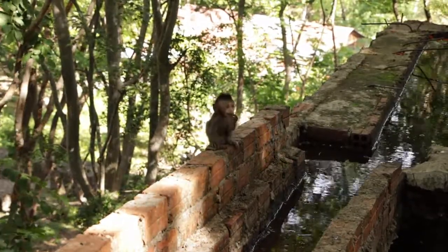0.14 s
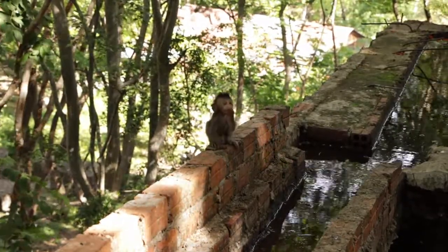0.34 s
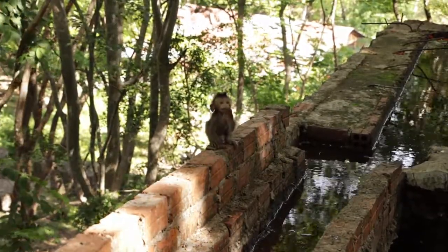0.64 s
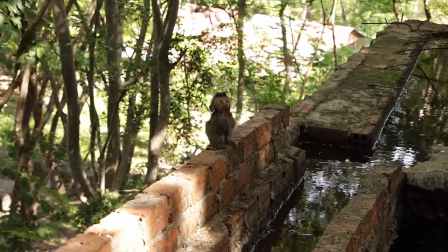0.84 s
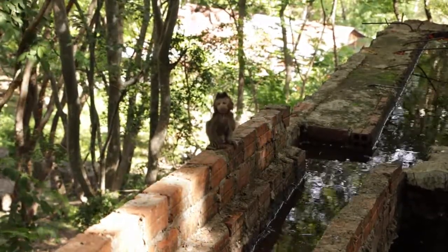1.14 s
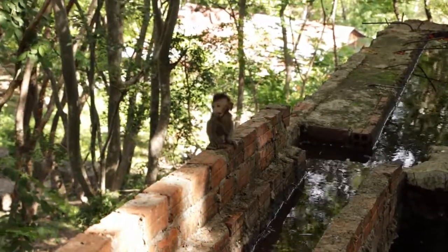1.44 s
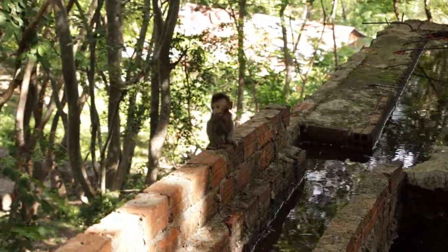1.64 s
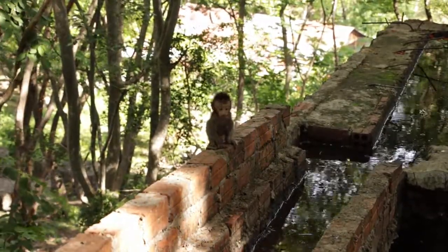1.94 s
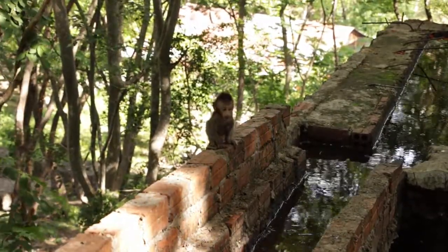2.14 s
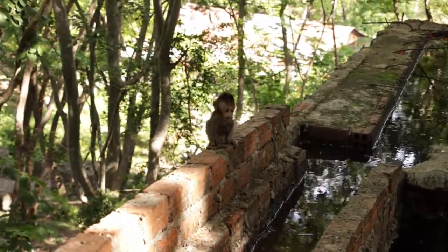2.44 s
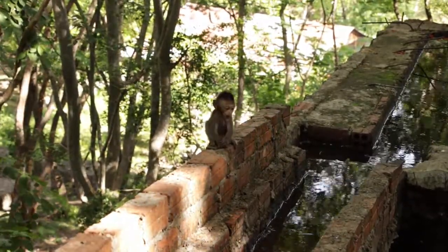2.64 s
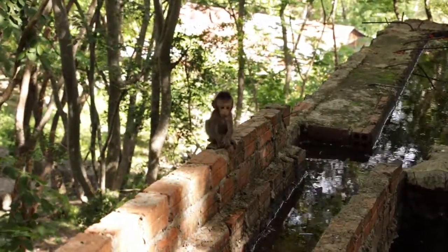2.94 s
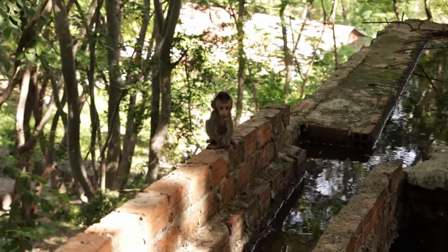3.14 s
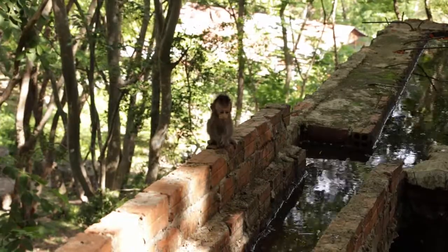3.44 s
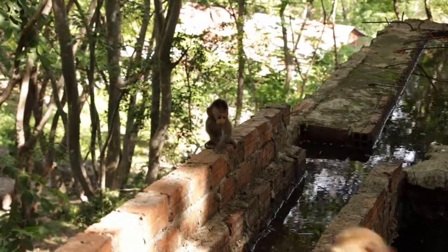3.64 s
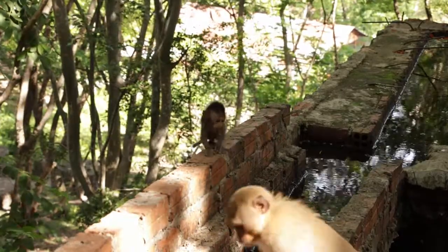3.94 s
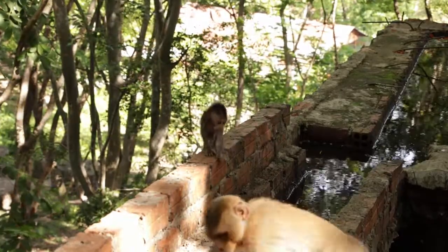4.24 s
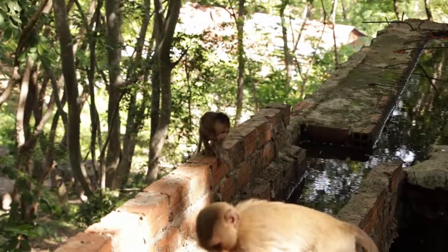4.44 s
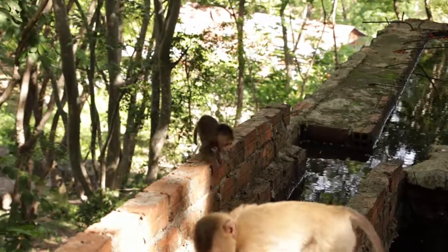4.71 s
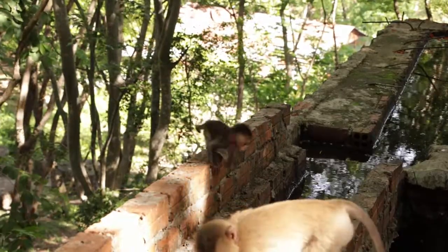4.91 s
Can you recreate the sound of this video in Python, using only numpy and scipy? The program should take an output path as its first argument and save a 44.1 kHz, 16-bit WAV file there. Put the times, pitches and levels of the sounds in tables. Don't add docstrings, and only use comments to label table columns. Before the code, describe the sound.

Birds whistle and chirp over a soft woodland wash while monkeys tap and snap dry leaves, ending in a hollow wooden knock and sharp cracks.

```python
import sys
import numpy as np
from scipy import signal
from scipy.io import wavfile
from scipy.ndimage import uniform_filter1d

SR = 44100
rng = np.random.default_rng(int(sys.argv[2]) if len(sys.argv) > 2 else 0)


def invert_db(level):
    return 10 ** (np.asarray(level, dtype=float) / 20)


def master_out(mix):
    frames = np.transpose(np.atleast_2d(mix))
    ceiling = np.clip(frames, -1, 1)
    pcm = np.round(ceiling * 32767).astype(np.int16)
    wavfile.write(sys.argv[1], SR, pcm)


N = 223719
LAG = 8
BIRD_LEAN_DB = 0.77


def evened(x):
    return x / np.sqrt(np.mean(x ** 2) + 1e-20)


def read(points, hz):
    f, value = np.transpose(points)
    return np.interp(np.log(hz + 1), np.log(f + 1), value)


def add(mix, s, sound):
    part = mix[..., round(s * SR):][..., :sound.shape[-1]]
    part += sound[..., :part.shape[-1]]


def sides(db):
    return invert_db(np.array([[db / 2], [-db / 2]]))


def band(x, lo_hz, hi_hz):
    sos = signal.butter(2, [lo_hz, hi_hz], "band", fs=SR, output="sos")
    return signal.sosfilt(sos, x) / np.sqrt(2 * (hi_hz - lo_hz) / SR)


def drift(size, hz):
    r = np.exp(-np.pi * hz / SR)
    settle = 3000
    white = rng.standard_normal((size + settle, 2)) @ [1, 1j]
    z = signal.lfilter([1], [1, -2 * r, r * r], white)[settle:]
    return z / np.sqrt(np.mean(abs(z) ** 2))


def paired(size, same):
    a, b = rng.standard_normal((2, size + LAG))
    left = same * a[:size] + np.sqrt(1 - same ** 2) * b[:size]
    return np.array([left, a[LAG:]])


def lagged(x):
    return np.array([np.roll(x, LAG), x])


def woods(x, t60, gap_s):
    t = np.arange(SR // 2) / SR
    tail = rng.standard_normal((2, len(t))) * invert_db(-60 * t / t60) * (t > gap_s)
    return signal.fftconvolve(x, tail / np.linalg.norm(tail[0]), axes=1)[:, :N]


def note(t, hz, hoarse_hz, db, edge):
    turn = np.exp(2j * np.pi * np.cumsum(hz) / SR)
    paths = np.array([drift(len(t), hoarse_hz), drift(len(t), hoarse_hz)])
    clear = np.exp(-hoarse_hz / 120)
    voice = (np.sqrt(clear) + np.sqrt(1 - clear) * paths) * turn
    return invert_db(db) * np.sqrt(2) * voice.real * signal.windows.tukey(len(t), edge)


def monkey_lean_db(s):
    # (time [s], left minus right [dB])
    path = [
        (0, -1),
        (2.75, -7),
        (2.9, 2),
        (3.16, -3.5),
        (4.0, -2.5),
        (4.6, -4),
        (5.07, -7),
    ]
    return np.interp(s, *np.transpose(path))


def crackle(size):
    grains_per_s = 300
    grains = invert_db(6.3 * np.minimum(rng.exponential(1, size), 4))
    grains = grains * (rng.random(size) < grains_per_s / SR)
    return evened(0.48 + signal.lfilter([1], [1, -.985], grains) / 1.24)


def brittle(db, hz, top_db, lean_db, rise, t60, flat, hiss, ring):
    t = np.arange(3000) / SR
    decay = invert_db(db - 9.0 - 60 * np.maximum(t - flat, 0) / t60)
    shape = decay * np.minimum(t / rise, 1) ** 2 * sides(lean_db)
    burst = paired(len(t), 0.15) * shape
    late = np.array([[LAG / SR], [0]])
    tone = np.sqrt(2) * np.sin(2 * np.pi * hz * (t - late)) * shape
    body = ring * tone + np.sqrt(1 - min(ring, 1) ** 2) * band(burst, 0.64 * hz, 1.29 * hz)
    return body + hiss * band(burst, 920, 6700) + invert_db(top_db + 7.5) * band(burst, 9800, 13300)


def wash():
    # (frequency [Hz], level per Hz [dB])
    spectrum = [(15, -25), (25, -18), (84, -2), (285, -5), (734, -12.5), (911, -11), (1070, -16.5),
                (1160, -11), (1260, -15.5), (1560, -13.5), (1890, -14.5), (2410, -15), (2840, -15.5),
                (5430, -19), (16000, -35)]
    # (frequency [Hz], correlation [-1 to 1])
    likeness = [(60, 0.77), (150, 1), (380, 0.79), (950, 0.28), (2380, 0.0127), (5980, 0.027),
                (15000, 0.01)]
    # (frequency [Hz], left minus right [dB])
    tilt = [(60, 2.5), (180, 1.5), (550, 1), (1650, -1), (4970, -1.0), (15000, 0.5)]
    # (time [s], level [dB])
    breeze = [
        (0, 2.5),
        (1.0, 2),
        (1.9, 1.6),
        (3.3, 0),
        (3.7, 2),
        (4.3, -2.5),
        (4.7, 2),
        (5.07, 0.5),
    ]
    level_db = -44
    frames, hz = N // 256 + 5, np.fft.rfftfreq(1024, 1 / SR)
    a, b, c, d, patches = rng.standard_normal((frames, 513, 5)).T
    patches = evened(uniform_filter1d(uniform_filter1d(patches, 12, 0), 14, 1))
    same = np.clip(read(likeness, hz), -1, 1)[:, None]
    left = a + 1j * b
    right = same * left + np.sqrt(1 - same ** 2) * (c + 1j * d)
    lean = read(tilt, hz)[:, None] / 2
    breeze_db = np.interp(np.arange(frames) * 256 / SR, *np.transpose(breeze))
    leaves = np.outer(hz / (hz + 900), breeze_db)
    z = np.array([left, right])
    z *= invert_db(read(spectrum, hz)[:, None] + 1.3 * patches + leaves + np.array([lean, -lean]))
    return invert_db(level_db) * evened(signal.istft(z, nperseg=1024, noverlap=768)[1][:, :N])


def hum():
    # (frequency [Hz], width [Hz], level [dB], left minus right [dB])
    lines = [
        (99.4, 8.6, -57, 0),
        (583.5, 6.2, -64, -8),
        (1020, 17.3, -67.5, 15.5),
    ]
    t = np.arange(N) / SR
    out = np.zeros((2, N))
    for hz, width, db, lean_db in lines:
        line = (drift(N, width) * np.exp(2j * np.pi * hz * t)).real
        out += sides(lean_db) * invert_db(db) * np.sqrt(2) * line
    return out


def whistles():
    # (time [s], length [s], frequency [Hz], level [dB], hoarseness [Hz])
    calls = [(0.001, 0.042, 722, -52, 78), (0.044, 0.054, 2883, -45, 24), (.105, 0.06, 2780, -49, 69),
             (0.211, 0.08, 2800, -55, 110), (.582, .13, 2520, -49.5, 5), (0.728, 0.027, 2480, -50, 200),
             (.785, 0.07, 2450, -51, 160), (0.805, .025, 2100, -50, 150), (.843, 0.025, 1790, -42, 43),
             (0.928, .04, 702, -52.5, 37), (1.04, 0.08, 3900, -53, 170), (1.045, 0.085, 2084, -49, 160),
             (1.069, 0.03, 2560, -49, 80), (0.909, 0.017, 1634, -44, 35), (1.645, 0.023, 2590, -45, 150),
             (1.111, 0.053, 2720, -40, 340), (1.146, 0.05, 2943, -37.5, 180), (1.15, 0.22, 2846, -45, 260),
             (1.371, .18, 2900, -50, 290), (1.659, 0.046, 2070, -51, 110), (1.665, 0.13, 2680, -55, 310),
             (1.504, 0.041, 1072, -50.5, 130), (1.938, 0.062, 2565, -45, 600),
             (2.048, 0.069, 2740, -50.5, 400), (1.72, 0.094, 1987, -55, 500),
             (1.989, 0.061, 2095, -52, 810), (2.07, .035, 1850, -54, 170), (0.987, .016, 1663, -42, 30),
             (1.027, 0.015, 2097, -36.5, 30)]
    out = np.zeros((2, N))
    for s, length, hz, db, hoarse_hz in calls:
        t = np.arange(0, length, 1 / SR)
        swell = invert_db(4.7 * (t / length - .5))
        add(out, s, sides(BIRD_LEAN_DB) * swell * note(t, hz + 0 * t, hoarse_hz, db, 0.19))
    return out


def taps():
    # (time [s], peak level [dB], frequency [Hz])
    blows = [(0.015, -28.5, 1580), (0.054, -38.5, 986), (0.414, -36.5, 1020), (1.887, -33.5, 1020),
             (1.929, -32.5, 695), (1.944, -30, 1057), (2.25, -34, 2320), (2.301, -31.5, 450),
             (2.305, -28.5, 338), (2.352, -38, 1188), (2.656, -33.5, 850), (2.753, -31.5, 723),
             (2.822, -26, 2100), (2.829, -33, 2180), (2.825, -29.5, 935), (2.839, -32.5, 904),
             (2.88, -27, 990), (2.938, -32, 987), (2.995, -33, 960), (2.955, -33.5, 330),
             (3.019, -33, 1090), (3.035, -35, 796), (3.193, -29.5, 1740), (3.275, -37, 650),
             (3.312, -36, 350), (3.922, -24, 895), (3.07, -35, 955), (3.089, -32.5, 617),
             (3.162, -28.5, 1120), (3.187, -31, 1140), (3.307, -34, 631), (3.344, -31.5, 1200),
             (3.63, -39, 620), (3.83, -30.5, 1455), (3.891, -42, 620), (4.012, -32, 800), (4.012, -36, 305),
             (4.044, -34, 1400), (4.054, -32.5, 1160), (4.075, -35, 670), (4.09, -36.5, 860),
             (4.125, -41, 770), (4.162, -38, 890), (4.662, -24, 2340), (4.76, -22.5, 2250)]
    lean_share = .4
    t, out = np.arange(4000) / SR, np.zeros((2, N))
    for s, db, hz in blows:
        ring = np.sin(2 * np.pi * hz * t)
        ring = ring + 0.16 * np.sin(2 * np.pi * hz * rng.uniform(1.1, 1.4) * t)
        puff = band(paired(len(t), 0.52), 0.49 * hz, 1.72 * hz)
        shape = invert_db(db + 2 - 60 * t / 0.055) * np.minimum(t / 0.0035, 1)
        lean = sides(monkey_lean_db(s) * lean_share * hz / 1000)
        add(out, s, (0.63 * lagged(ring) + 0.53 * puff) * shape * lean)
    return out


def ticks():
    # (time [s], peak level [dB], centre [Hz], top band re peak [dB])
    breaks = [(0.0185, -30.5, 5340, -30), (0.0933, -28.5, 5030, -26), (0.1336, -34.5, 4500, -16),
              (0.5506, -26, 4880, -22), (0.5811, -42, 4300, -14.5), (0.81, -35.5, 5030, -7),
              (1.1655, -27, 4360, -14), (1.917, -29, 6730, -19), (2.0995, -25, 8500, -23),
              (2.244, -38, 6240, -9), (2.486, -29.5, 6450, -11.5), (2.5029, -39, 5700, -3),
              (2.655, -36, 4690, -2), (2.7255, -17, 7250, -32), (2.7652, -27, 5800, -13.5),
              (2.881, -18.5, 7540, -27), (3.5916, -35, 4220, -20), (3.642, -27, 5970, -16),
              (3.673, -26.5, 5570, -6.5), (4.8529, -31, 6500, -13)]
    out = np.zeros((2, N))
    for s, *blow in breaks:
        add(out, s - .0012, brittle(*blow, -4.5, rise=0.0022, t60=0.016, flat=0.0019, hiss=0.68, ring=0.46))
    return out


def chirps():
    # (time [s], level [dB], hoarseness [Hz])
    calls = [(0.206, -49, 174), (0.275, -40.5, 174), (0.341, -46, 220), (1.342, -49, 266),
             (1.415, -44, 310), (1.495, -47, 200), (2.306, -45.5, 65), (2.371, -47.5, 40), (2.436, -47, 58),
             (3.365, -49.5, 70), (3.433, -46, 35), (3.498, -44.5, 69), (3.532, -57, 80), (3.818, -46, 100),
             (3.884, -47, 100), (3.95, -45, 60), (4.472, -53, 30), (4.498, -55, 23), (4.536, -47.5, 38),
             (4.572, -47.5, 40), (4.602, -50, 15), (4.645, -42, 270), (4.675, -43.5, 270),
             (4.707, -45, 270)]
    start_hz, fall_hz, length, swell_db = 3300, 570, .04, 4
    t, out = np.arange(0, length, 1 / SR), np.zeros((2, N))
    hz = start_hz - fall_hz * np.sin(1.3 * t / length)
    for s, db, hoarse_hz in calls:
        add(out, s, note(t, hz, hoarse_hz, db + swell_db * (t / length - .5), 0.7))
    return out


def swoops():
    # (time [s], length [s], start frequency [Hz], level [dB])
    calls = [
        (0.288, 0.065, 3050, -44.5),
        (0.789, 0.046, 2449, -47),
        (1.317, 0.0683, 2830, -44),
        (1.616, 0.082, 2948, -43.5),
    ]
    hz_per_s, hoarse_hz = -14500, 336
    out = np.zeros((2, N))
    for s, length, hz, db in calls:
        t = np.arange(0, length, 1 / SR)
        add(out, s, sides(BIRD_LEAN_DB) * note(t, hz + hz_per_s * t, hoarse_hz, db, 0.087))
    return out


def snaps():
    # (time [s], peak level [dB], centre [Hz], top band re peak [dB])
    breaks = [(0.413, -26, 2270, -28.5), (1.8866, -28, 2630, -19), (1.987, -22, 2780, -17.5),
              (2.134, -29, 2920, -12), (2.154, -34, 5110, -13), (2.2514, -31, 6240, -17.5),
              (2.4687, -37, 2880, -9.5), (2.6377, -32, 4510, -9), (2.697, -35, 2300, -22),
              (2.701, -33, 3870, -17), (2.865, -31, 2900, -15), (2.8976, -20.5, 2400, -21.5),
              (2.9128, -25, 4100, -20), (2.925, -27, 4200, -21.5), (2.9417, -30, 3480, -18),
              (2.953, -32, 3800, -25), (2.975, -36, 4200, -25), (3.003, -31, 2610, -25),
              (3.067, -32, 3030, -25), (3.1632, -28.5, 3120, -26.5), (3.1882, -27.5, 3650, -26.5),
              (3.7833, -26.5, 2580, -27.5), (3.854, -24, 3300, -23.5), (3.897, -44, 3070, -17),
              (4.468, -27, 3170, -19.5), (4.583, -32.5, 2900, -25.5), (4.6439, -25, 3020, -27),
              (4.6632, -17, 2730, -27), (4.7588, -10.5, 2890, -30), (4.827, -30, 3420, -19.5),
              (4.9198, -16.5, 3770, -23), (4.9553, -24, 3830, -21), (5.0274, -30, 4000, -20)]
    out = np.zeros((2, N))
    for s, *blow in breaks:
        add(out, s - .0012, brittle(*blow, monkey_lean_db(s), rise=0.0016, t60=0.016, flat=0.0026,
                                    hiss=0.33, ring=0.82))
    return out


def warble():
    # (delay [s], level [dB])
    slaps = [
        (.013, -7),
        (.027, -9),
        (.05, -11),
    ]
    start_s, length, db, hoarse_hz = .845, .205, -39, 100
    centre_hz, swing_hz, swing_s, dip_s, climb_hz_per_s = 1860, 265, .0735, .92, 100
    t = np.arange(0, length, 1 / SR)
    growth = np.minimum(0.22 + t / 0.088, 1)
    swing = -np.cos(2 * np.pi * (t + start_s - dip_s) / swing_s) * growth
    dwell = invert_db(-6 * (1 - swing ** 2) - .5 * swing)
    hz = centre_hz + climb_hz_per_s * t + swing_hz * swing
    direct = np.zeros((2, N))
    add(direct, start_s, sides(BIRD_LEAN_DB) * dwell * note(t, hz, hoarse_hz, db, 0.157))
    out = direct.copy()
    for delay, slap_db in slaps:
        add(out, delay, invert_db(slap_db) * direct[::-1] * drift(N, 25).real)
    return out


def crunches():
    # (time [s], peak level [dB], centre [Hz], top band re peak [dB])
    breaks = [(1.386, -34, 9500, -19), (1.536, -39, 8000, -20), (1.8883, -34, 6520, -14.5),
              (1.926, -26, 6800, -14), (1.942, -27.5, 6500, -26.5), (2.108, -36.5, 6610, -8.5),
              (2.1583, -36.5, 5420, -9), (2.213, -39, 5370, -9.5), (2.2327, -33.5, 6250, -23),
              (2.7756, -33, 5870, -8), (2.796, -35, 5880, -8), (2.824, -46, 3950, -19.5),
              (3.828, -32.5, 3600, -26), (3.949, -30, 3400, -17), (3.9638, -35.5, 5070, -26.5)]
    out = np.zeros((2, N))
    for s, *blow in breaks:
        add(out, s - .002, brittle(*blow, monkey_lean_db(s), rise=0.0043, t60=0.027, flat=0.0099,
                                   hiss=1.0, ring=0.37))
    return out


def riser():
    start_s, length, db, hoarse_hz = 1.445, 0.195, -37, 80
    from_hz, to_hz, glide_s, fade_db = 1250, 2070, 0.088, -5
    t = np.arange(0, length, 1 / SR)
    up = np.sin(1.25 * np.minimum(t / glide_s, 1)) / np.sin(1.25)
    hz = from_hz + (to_hz - from_hz) * up
    out = np.zeros((2, N))
    add(out, start_s, sides(BIRD_LEAN_DB) * invert_db(fade_db * up ** 4) * note(t, hz, hoarse_hz, db, 0.23))
    return out


def scrapes():
    # (time [s], length [s], level [dB], low edge [Hz], high edge [Hz])
    drags = [(1.542, 0.065, -53.5, 6000, 10500), (1.921, 0.061, -36.5, 2180, 3370),
             (2.817, 0.028, -39.5, 800, 2400), (2.878, 0.12, -42.5, 600, 2500),
             (2.908, 0.07, -46, 3300, 4770), (2.989, 0.057, -41, 550, 1620), (3.064, 0.031, -42, 500, 2250),
             (3.146, 0.059, -42.5, 790, 2170), (3.299, 0.055, -39.5, 497, 2000),
             (3.508, 0.084, -47.5, 1540, 2860), (3.584, 0.11, -54, 2000, 9000),
             (3.822, 0.051, -46, 1200, 4530), (3.884, 0.031, -39.5, 550, 3080),
             (3.989, .035, -39.5, 700, 4320), (4.045, 0.094, -45, 598, 1260),
             (4.572, 0.028, -43, 900, 2600), (4.638, 0.16, -46.5, 396, 1090),
             (4.657, 0.12, -37.5, 1460, 3860), (4.679, 0.085, -50, 4200, 10000),
             (4.795, 0.091, -41, 910, 2920)]
    out = np.zeros((2, N))
    for s, length, db, lo_hz, hi_hz in drags:
        size = int(length * SR)
        drag = paired(size, 0.263) * crackle(size) ** 0.4 * signal.windows.tukey(size, .45)
        add(out, s, invert_db(db) * sides(monkey_lean_db(s)) * band(drag, lo_hz, hi_hz))
    return out


def rustle():
    # (time [s], level [dB])
    stirring = [
        (1.8, -55),
        (2.66, -55.5),
        (2.91, -44),
        (3.34, -58),
        (3.901, -47),
        (4.23, -53.5),
        (5.07, -62.5),
    ]
    # (low edge [Hz], high edge [Hz])
    bands = [
        (450, 1040),
        (3500, 10600),
        (9000, 22000),
        (189, 380),
    ]
    layers = [(-54.0, 0.813, 0.97), (-57.5, 0.75, -1.5), (-62.5, 0.63, -1.5),
              (-56.5, 0.81, -0.89)]
    t = np.arange(N) / SR
    s, db = np.transpose(stirring)
    stir_db = np.interp(t, s, db) + 56
    bed = paired(N, 0.58) * crackle(N) ** .5 * (t > s[0])
    out = np.zeros((2, N))
    for (rest_db, share, lean_db), edges in zip(layers, bands):
        out += band(bed * invert_db(rest_db + share * stir_db) * sides(lean_db), *edges)
    return out


def gust():
    # (time [s], level [dB])
    rumble = [
        (3.55, -60),
        (4.15, -57),
        (4.256, -33.5),
        (4.316, -44),
        (5.07, -68),
    ]
    # (time [s], level [dB], width [s], signed strength)
    eddies = [
        (3.738, -27, 0.00155, 0.83),
        (3.789, -31.5, 0.0019, -0.71),
        (3.82, -31.5, 0.0018, 0.97),
        (4.222, -31, 0.0041, 0.73),
        (4.24, -21, 0.0011, 0.82),
        (4.2545, -16, 0.0012, 0.99),
        (4.279, -24.5, 0.002, -1.14),
        (4.291, -34, 0.0032, -0.97),
        (4.32, -40.5, 0.00265, 1),
    ]
    s, db = np.transpose(rumble)
    t = np.arange(N) / SR
    out = band(rng.standard_normal(N), 20.6, 112) * invert_db(np.interp(t, s, db) + 2) * (t > s[0])
    for s, db, width, sign in eddies:
        u = np.arange(-.03, .03, 1 / SR) / width
        add(out, s - .03, sign * invert_db(db) * u * np.exp((1 - u ** 2) / 2))
    return out * np.array([[1], [.12]])


def knock():
    # (frequency [Hz], level [dB], 60 dB decay [s])
    modes = [(307, -13.5, 0.1), (416, -18, 0.02), (573, -15, 0.024), (651, -0.5, 0.15), (860, -3.5, 0.085),
             (1006, -0.5, 0.055), (1119, -1, 0.061), (1274, 0, 0.03), (1460, -3, 0.055),
             (1610, -10.5, 0.16), (2130, -2.5, 0.071)]
    # (time [s], level [dB], frequency [Hz])
    bounces = [
        (3.9313, -10, 830),
        (3.935, -2.5, 940),
        (3.94, -6, 895),
    ]
    start_s, ring_db, crack_db, scatter_db = 3.9288, -10, -11.5, -22.5
    t, out = np.arange(SR // 3) / SR, np.zeros((2, N))
    ring = sum(invert_db(db - 60 * t / min(t60, .2)) * np.sin(2 * np.pi * hz * t) for hz, db, t60 in modes)
    ring = invert_db(ring_db) * ring * np.minimum(t / 0.00184, 1)
    noise = paired(len(t), 0.55)
    crack = band(noise, 2120, 4860) + 0.51 * band(noise, 4100, 8360)
    crack *= invert_db(crack_db - 60 * t / 0.049) * np.minimum(t / 0.00076, 1) * sides(-7.5)
    scatter = band(noise, 590, 1430) + .5 * band(noise, 2230, 3050)
    scatter *= invert_db(scatter_db - 60 * t / 0.22)
    add(out, start_s, 0.54 * lagged(ring) + crack + scatter)
    for s, db, hz in bounces:
        thump = -invert_db(db - 60 * t / 0.012) * np.sin(2 * np.pi * hz * t) * np.minimum(t / .0007, 1)
        add(out, s, lagged(thump))
    return out


def scene():
    callers = whistles() + swoops() + warble() + riser()
    small = chirps()
    birds = callers + small + woods(invert_db(-2.5) * callers + invert_db(-4.5) * small, 0.49, 0.0062)
    near = taps() + ticks() + snaps() + crunches() + scrapes() + rustle() + knock()
    near_echo = invert_db(-15.0) * woods(near, 0.29, 0.0034)
    return wash() + hum() + birds + near + near_echo + gust()


def top_cut(x):
    return signal.sosfilt(signal.butter(12, 17010, fs=SR, output="sos"), x)


def record(dry):
    limited = .95 * np.tanh(dry / .95)
    edge = signal.firwin(255, 15950, window=("kaiser", 8), fs=SR)
    mix = signal.oaconvolve(limited, edge[None], "same")
    return top_cut(mix)


dry = scene()
out = record(dry)
master_out(out)
```